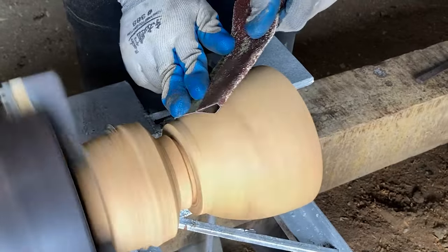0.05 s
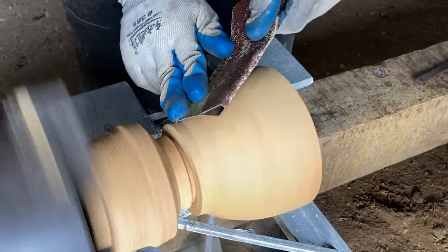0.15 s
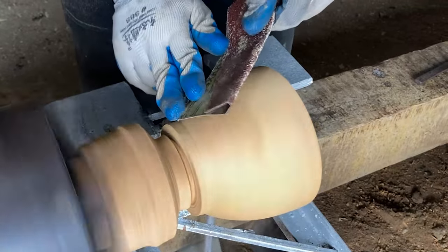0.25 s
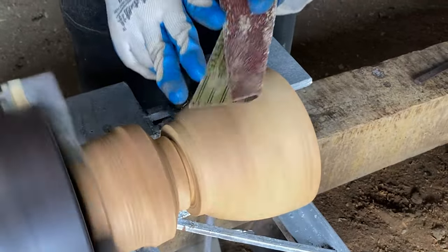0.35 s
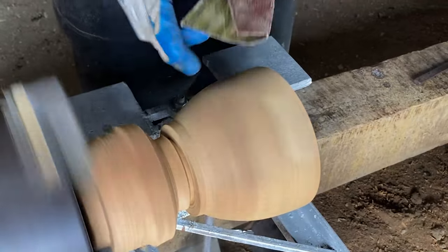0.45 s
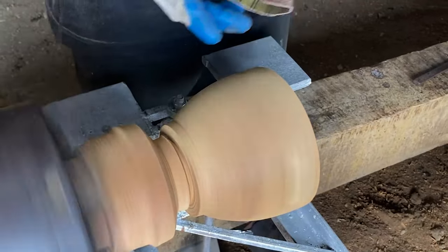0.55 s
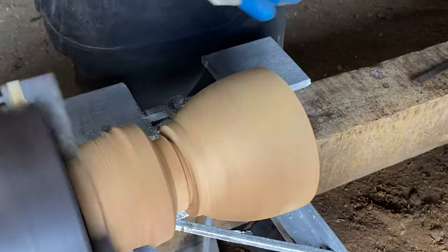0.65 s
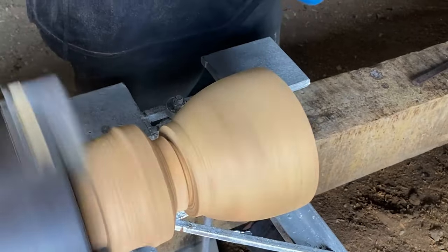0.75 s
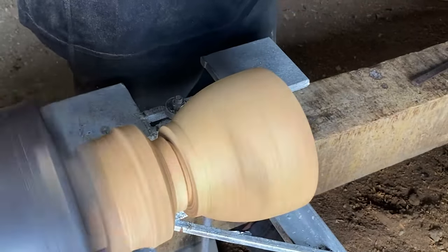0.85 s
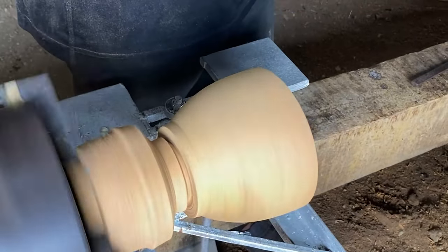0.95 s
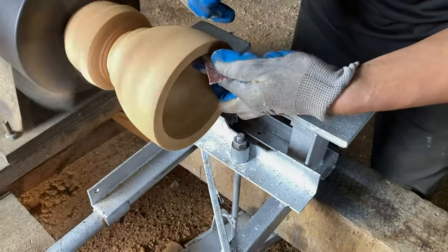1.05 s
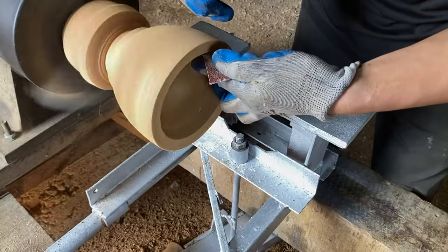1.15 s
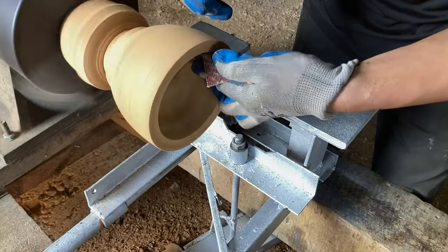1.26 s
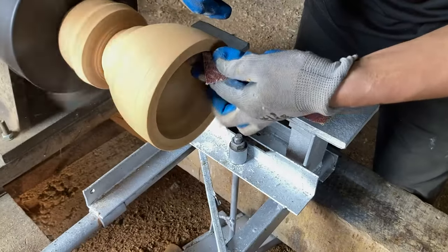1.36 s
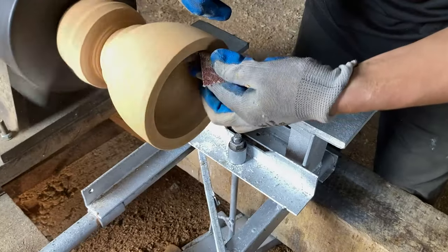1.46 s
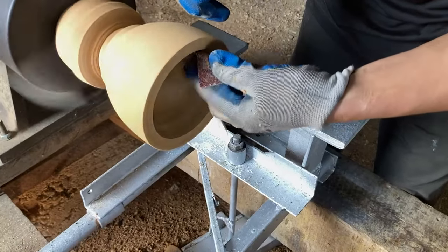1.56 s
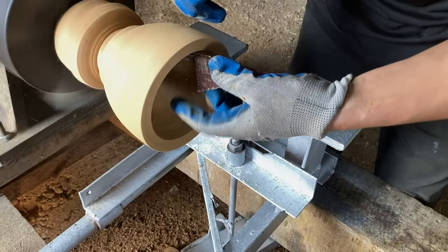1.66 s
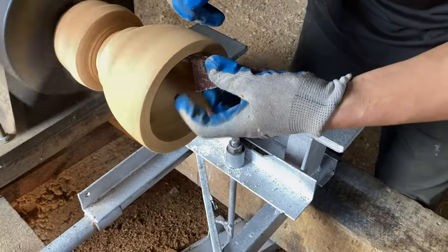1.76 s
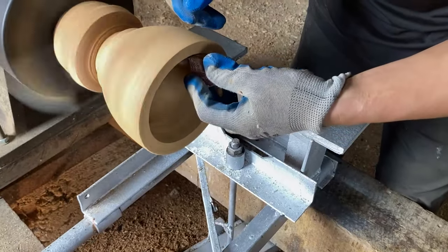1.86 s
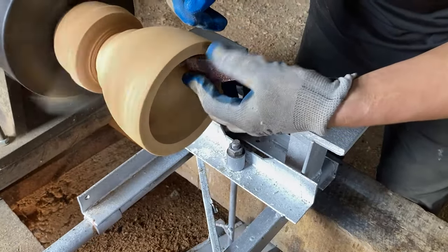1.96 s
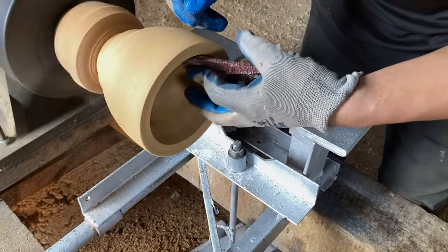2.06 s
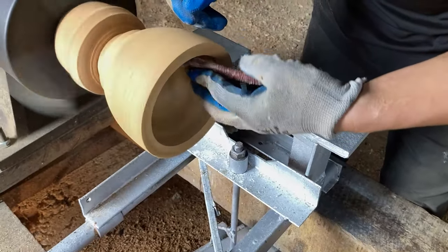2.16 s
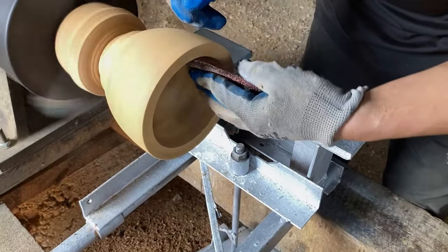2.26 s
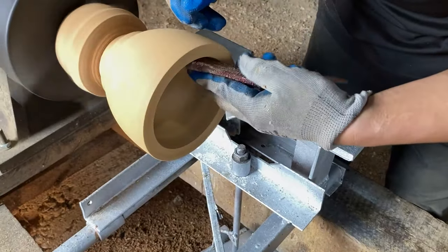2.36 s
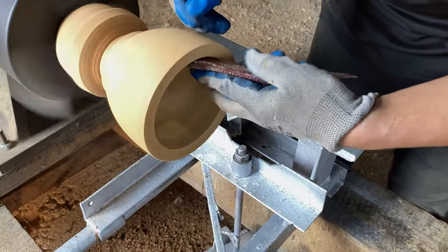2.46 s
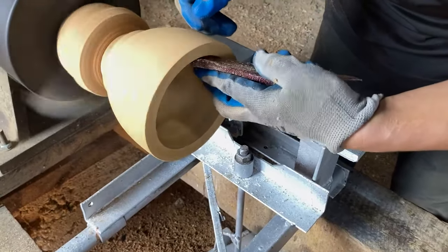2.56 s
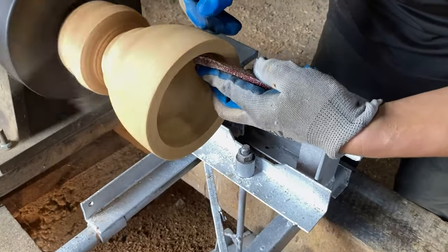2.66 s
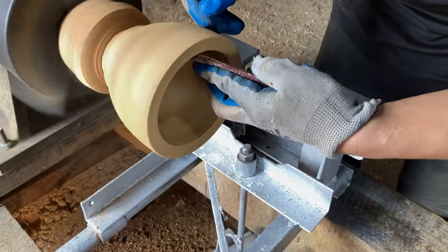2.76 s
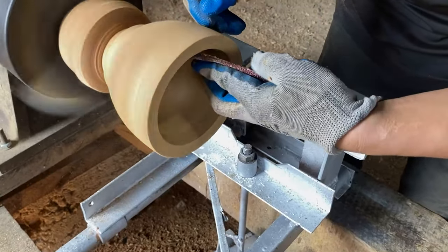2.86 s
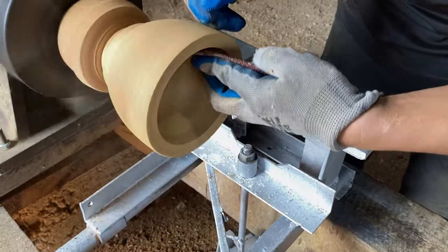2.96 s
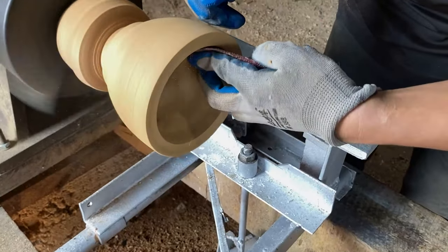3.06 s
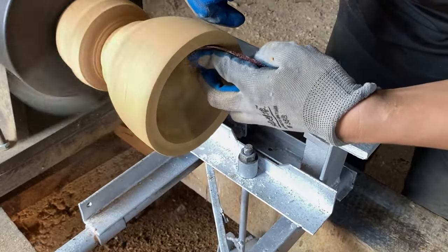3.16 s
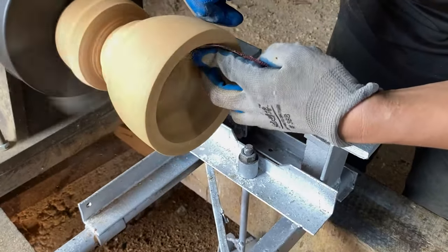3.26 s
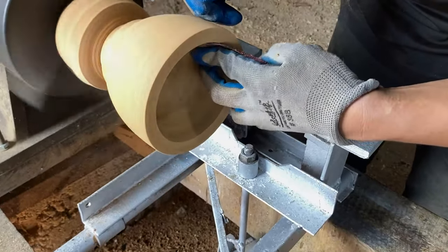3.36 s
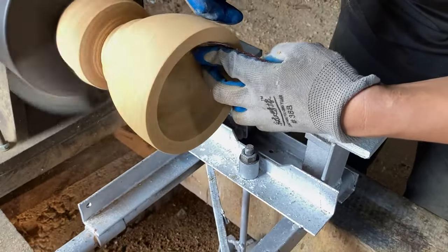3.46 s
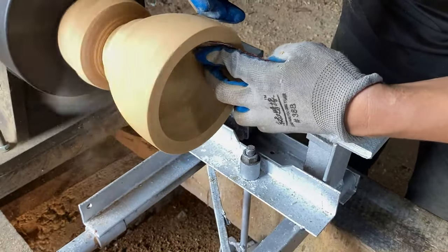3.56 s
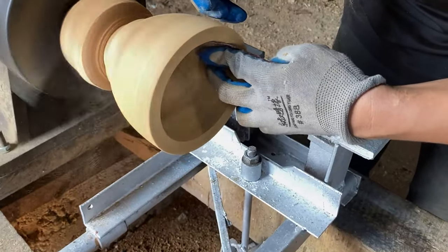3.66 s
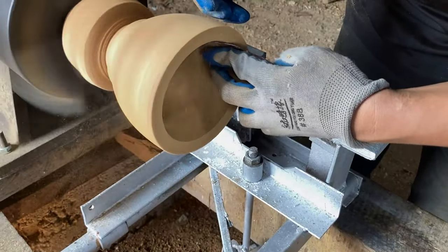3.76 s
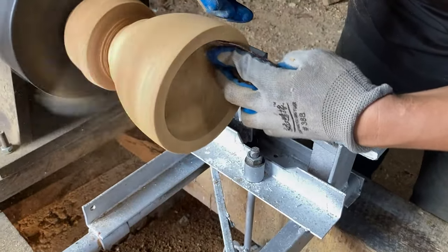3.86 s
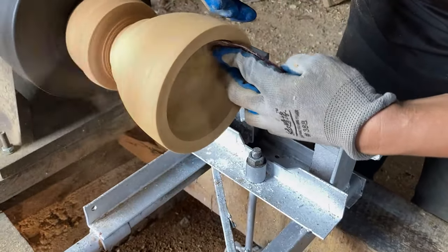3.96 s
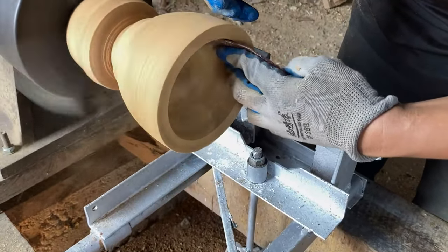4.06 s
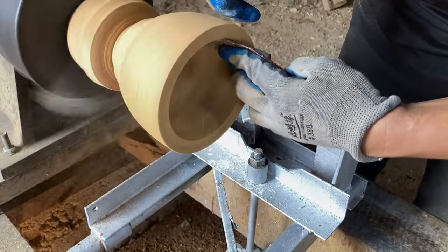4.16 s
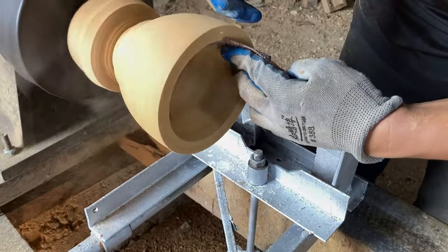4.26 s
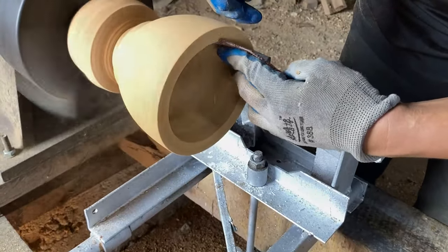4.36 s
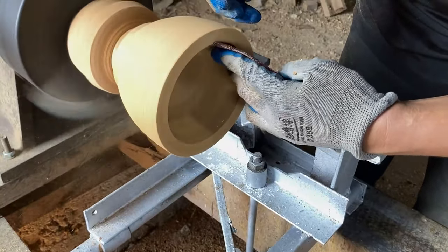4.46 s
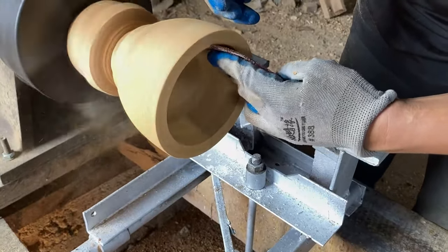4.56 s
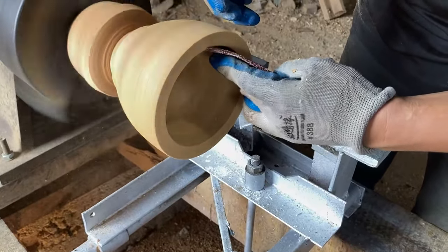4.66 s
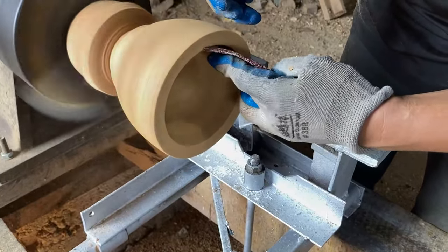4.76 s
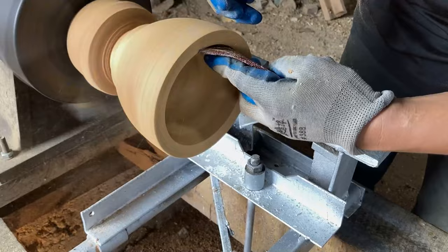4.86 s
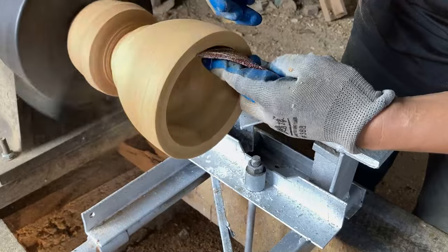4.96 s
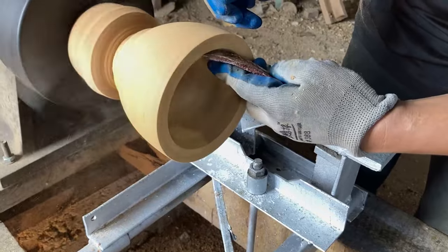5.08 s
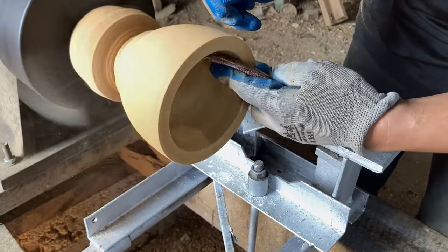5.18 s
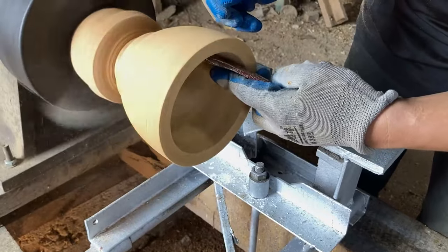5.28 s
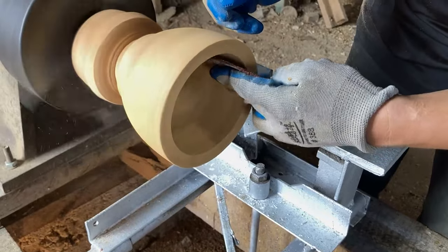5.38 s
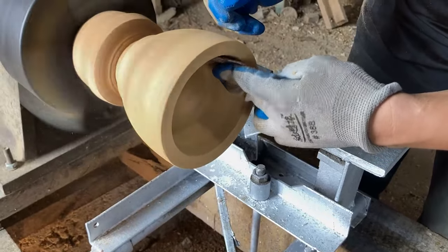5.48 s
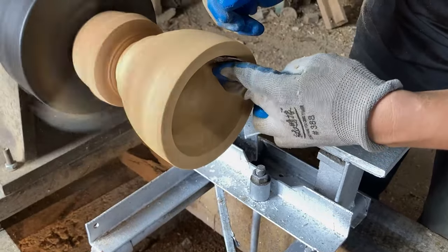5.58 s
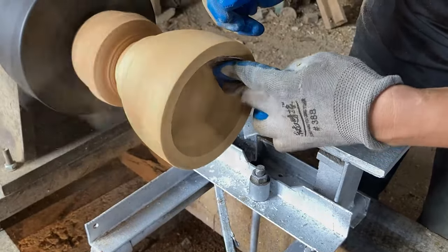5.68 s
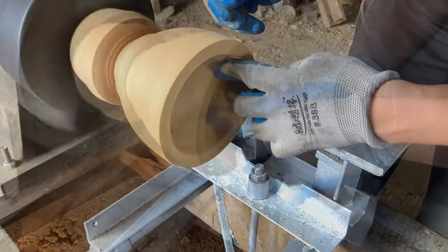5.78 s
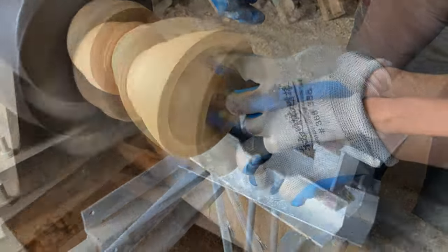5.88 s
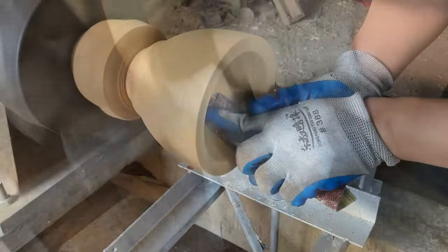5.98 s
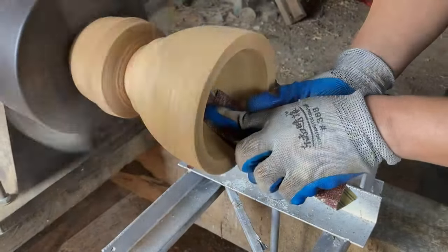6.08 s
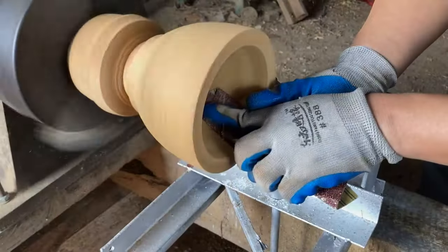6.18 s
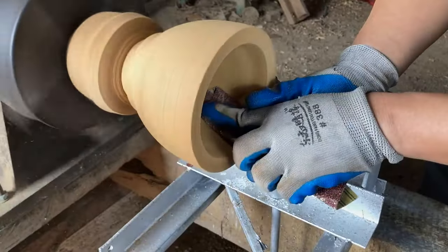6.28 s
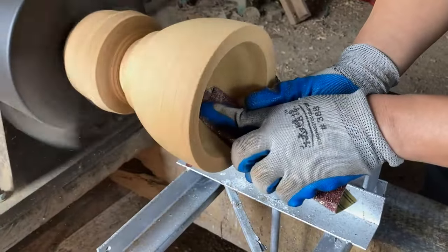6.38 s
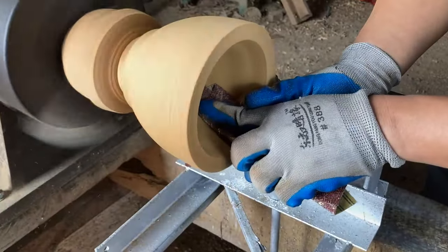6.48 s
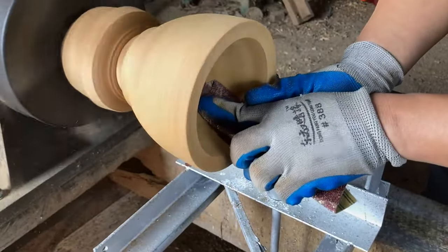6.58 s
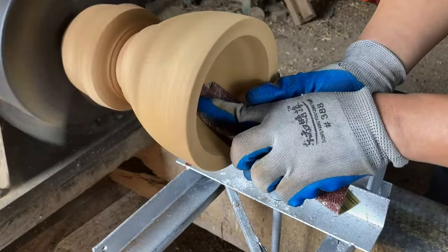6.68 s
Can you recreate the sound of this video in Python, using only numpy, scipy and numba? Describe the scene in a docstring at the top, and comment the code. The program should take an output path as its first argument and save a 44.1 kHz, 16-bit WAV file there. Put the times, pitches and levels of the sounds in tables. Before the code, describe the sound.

An electric lathe drones steadily with a thin whine and low rumble. Airy sandpaper hiss on turning wood stops almost at once, leaving the motor alone. From a new close position the paper brushes the rim, then rasps continuously inside the hollow cup with crackly catches, shifting woody resonances and faint glove rubbing. It weakens, nearly lets go, returns, and finally softens. Short, dry workshop reflections surround it.

```python
"""A wooden cup spins on a motor-driven lathe in a workshop and is sanded by hand: outside, then at the rim, then inside.
Grit scrapes the wood as countless tiny impacts, which hiss and ring the cup's wall and hollow; the grain
comes round with every turn. Meanwhile a glove rubs, the paper squeaks once and the cup's air booms softly.
The induction motor hums and whines throughout as a set of steady tones over the rumble of bearings, belt and fan.
A close two-port microphone hears it from one place, then, after about a second, from another."""
import sys
import numpy as np
from scipy import signal
from scipy.fft import rfft, irfft
from scipy.io import wavfile
from numba import njit

SR = 44100
rng = np.random.default_rng(int(sys.argv[2]) if len(sys.argv) > 2 else 0)


def persist_wave(psi):
    """Save psi, clipped to +-1, as 16-bit WAV."""
    counts = np.round(np.clip(psi, -1, 1) * 32767).astype(np.int16)
    wavfile.write(sys.argv[1], SR, np.atleast_2d(counts).T)


N = 296793
TIME, BINS = np.arange(N) / SR, np.fft.rfftfreq(N, 1 / SR)

MAINS_HZ, SPINDLE_HZ = 50., 11.1
MOVE_S = 1.069  # the listening place changes
TOP_HZ = 15750
# every touch of the paper takes hold and lets go alike; after LET_GO_S it has left the wood
ATTACK_S, RELEASE_DB_PER_S, LET_GO_S = 0.017, 176, 0.15


def undb(db):
    """Level to amplitude: decibels become a gain."""
    return 10 ** (np.asarray(db) / 20)


def unit(x):
    """Normalisation: scale to an rms of one."""
    return x / np.sqrt(np.mean(x ** 2))


def curves(table):
    """Linear interpolation: each column of a timed table, sample by sample."""
    s, *columns = np.transpose(table)
    return [np.interp(TIME, s, column) for column in columns]


def colour(points):
    """Spectral envelope: gain at every frequency from (hz, db) points on a logarithmic frequency axis."""
    hz, db = np.transpose(points)
    return undb(np.interp(np.log(BINS + 1), np.log(hz), db))


def resonances(modes):
    """Modal superposition: response of a few damped modes of alternating sign."""
    f = BINS + 1
    total = 0
    for k, (hz, width_hz, db) in enumerate(modes):
        total = total + (-1) ** k * undb(db) / (1 + 1j * (f * f - hz * hz) / (f * width_hz))
    return total


def through(x, response):
    """Linear filtering by a frequency response, brought to an rms of one."""
    return unit(irfft(rfft(x) * response, N))


def walk(rate_hz):
    """Low-passed chance: changes smoothly about `rate_hz` times a second; spread one."""
    return through(rng.standard_normal(N), np.exp(-(BINS / rate_hz) ** 2))


def bump(s, length_s):
    """Gaussian envelope: a bell-shaped swell around time s."""
    return np.exp(-(2 * (TIME - s) / length_s) ** 2)


def moved():
    """Crossfade of viewpoint: zero at the first listening place, one at the second."""
    return np.clip((TIME - MOVE_S) / .003, 0, 1)


@njit
def gliding_band(x, hz, width):
    """Time-varying resonance: a state-variable band-pass whose centre moves."""
    y, band, low = np.empty(len(x)), 0., 0.
    for i in range(len(x)):
        g, damping = np.tan(np.pi * hz[i] / SR), width / hz[i]
        v = (band + g * (x[i] - low)) / (1 + g * (g + damping))
        band, low, y[i] = 2 * v - band, low + 2 * g * v, damping * v
    return y


def wood_grain(count=14):
    """Periodic excitation: uneven wood passes under the paper at every turn and changes as the paper travels."""
    turns = SPINDLE_HZ * TIME
    grain = 0
    for k in range(1, count + 1):
        phase = 2 * np.pi * (k * turns + rng.random()) + .7 * walk(1)
        grain = grain + max(k, 4) ** -.5 * np.sin(phase)
    return unit(grain)


def snags(rate_hz=200.0, decay_s=0.0099, unevenness=1.6, yield_s=0.038, count=2400):
    """Stick and relaxation: grits dig in suddenly and let go slowly, while the hand yields; mean zero, spread one."""
    chance = rng.random((count, 2))
    at_s = np.cumsum(.3 + 1.4 * chance[:, 0]) / rate_hz
    hits = np.bincount((at_s * SR).astype(int), chance[:, 1] ** unevenness, N)[:N]
    dug = signal.lfilter([1], [1, -np.exp(-1 / (decay_s * SR))], hits - hits.mean())
    # the yielding hand evens out slow pressure changes
    return unit(signal.lfilter([1, -1], [1, -np.exp(-1 / (yield_s * SR))], dug))


def contact(grain_db=1.0, snag_db=1.24):
    """Contact force between paper and wood: the turning grain, snagging grits and brief catches multiply."""
    # the paper catches on the wood: centre_s, length_s, swell_db
    catches = [(0.124, 0.11, 2), (0.248, 0.0048, 10), (0.291, 0.026, 8.5), (1.348, 0.031, 1),
               (1.432, 0.0038, 9), (1.52, 0.007, 10), (1.552, 0.012, 4), (1.59, 0.013, 1),
               (1.954, 0.013, 5), (2.04, 0.012, 4.5), (2.686, 0.028, 2), (2.76, 0.014, 3.5),
               (2.868, 0.049, 2), (2.961, 0.018, 4), (2.995, 0.017, 5.5), (3.009, 0.0071, 8),
               (3.024, 0.0079, 4), (3.041, 0.015, 3), (3.383, 0.0098, 0), (3.738, 0.023, 1.5),
               (3.838, 0.035, 3.5), (4.03, 0.022, 0), (4.189, 0.02, 4), (5.58, 0.012, 1),
               (6.682, 0.0086, 4.5)]
    catch_db = sum(db * bump(s, length_s) for s, length_s, db in catches)
    return undb(grain_db * wood_grain() + snag_db * snags() + catch_db)


def grit(force, spread_db=1.87):
    """Impact noise: countless tiny impacts of uneven size, scaled by the force."""
    return force * rng.standard_normal(N) * undb(spread_db * walk(2100))


def touch(start_s, length_s, db):
    """Exponential release: a touch takes hold, stays, and dies away until the paper leaves the wood."""
    lifting_s = np.maximum(TIME - start_s - length_s, 0)
    contact_share = np.clip(np.minimum(TIME - start_s, LET_GO_S - lifting_s) / ATTACK_S, 0, 1)
    return contact_share * undb(db - RELEASE_DB_PER_S * lifting_s)


def crumple(x, depth_db, count=18):
    """Independent band modulation: the paper flexes, so neighbouring bands of its hiss swell and sink by themselves."""
    place = np.interp(BINS, [1200, 14000], [0, count - 1])
    spectrum = rfft(x)
    total = 0
    for k in range(count):
        band = irfft(spectrum * np.clip(1 - abs(place - k), 0, 1), N)
        total = total + band * undb(depth_db * walk(8))
    return unit(total)


def ringing(force, hz, width_hz):
    """Forced resonance: grit in one moving band, filtered twice for steep flanks."""
    once = gliding_band(grit(force), hz, 2. * width_hz)
    return unit(gliding_band(once, hz, 2. * width_hz))


def sanding_outside(force, until_s=0.21, level_db=-30.5):
    """Free radiation: paper laid on the outer wall hisses without the hollow and is lifted off."""
    # the paper's hiss on the open outside: frequency_hz, relative_level_db
    hiss_outside = [(500, -26), (1300, -12), (2000, -13.5), (3200, -8.5), (4400, -9), (6000, -5.5),
                    (7300, -6.5), (10000, -2.5), (12000, -4.5), (15000, -10.5)]
    level = touch(-ATTACK_S, until_s + ATTACK_S, level_db)
    return level * crumple(through(grit(force), colour(hiss_outside)), 0.97)


def steady_scrape(gain_db=1):
    """Amplitude envelope of the long stroke inside the cup."""
    # how hard the paper scrapes once it stays on the wood: time_s, level_db (before gain_db)
    stroke = [(1.4, -55), (1.47, -36.5), (1.51, -33.5), (1.56, -28.5), (1.63, -32), (1.77, -31),
              (1.81, -35.5), (1.85, -28.5), (1.97, -29), (2.15, -30.5), (2.37, -30.5), (2.5, -30),
              (2.58, -30.5), (2.8, -30), (2.97, -29.5), (3.09, -29), (3.33, -27), (3.48, -29),
              (3.62, -30.5), (4.02, -29), (4.07, -31.5), (4.35, -33.5), (4.7, -32), (4.96, -31.7),
              (5.2, -36.5), (5.23, -41.5), (5.34, -40.5), (5.45, -36), (5.58, -31.5), (5.68, -29.5),
              (5.81, -32.5), (5.96, -30), (6.08, -34), (6.72, -39)]
    db, = curves(stroke)
    attack = np.clip((TIME - stroke[0][0]) / ATTACK_S + 1, 0, 1)
    return attack * undb(db + gain_db)


def paper_inside(force, scrape):
    """Filtered noise: hiss, brighter on the rim and restless while loose, with gliding paper and air-gap resonances."""
    # the paper's hiss inside the cup: frequency_hz, relative_level_db
    hiss_inside = [(300, -46), (1050, 2), (1350, -3), (1700, -2.5), (2000, -5.5), (2300, 0), (2800, -4),
                   (3600, 8), (4100, 9.5), (5000, 5), (6300, -2), (7300, 1), (8400, -12.5), (10000, 6.5),
                   (12000, 1), (15500, -3)]
    # the paper's hiss on the rim: frequency_hz, relative_level_db
    hiss_rim = [(300, -35), (1050, -7), (1350, -19), (1800, 2), (2700, 0), (3600, 7.5), (4500, 8.5),
                (5500, 4), (6300, -1), (7400, -5), (8600, -16), (10000, 13), (11500, 7.5), (15500, -3)]
    # short touches at the rim: start_s, length_s, level_db (before the hiss and resonance gains)
    rim_touches = [(1.021, 0.19, -34.5), (1.284, 0.12, -33.5)]
    # the bent paper's resonance follows the grip: time_s, pitch_hz, level_db (re scrape, before gain_db)
    paper_ring = [(1.22, 7400, -2.5), (1.32, 8130, 2.5), (1.55, 7600, -1.5), (2.1, 7400, -2.5),
                  (2.45, 7770, -1.5), (3.2, 7870, -1.5), (3.45, 7530, -0.5), (4.2, 7770, -3.5),
                  (5.1, 7400, -3), (5.7, 7900, -5), (6.1, 7760, -1.5), (6.7, 7800, 1)]
    # so does the air gap between fingers, paper and wall: time_s, pitch_hz, level_db (likewise)
    gap_ring = [(1.15, 4470, 2), (1.4, 5030, -31), (2.7, 5000, -8), (3.05, 5300, -5.5), (3.3, 4930, -7.5),
                (3.8, 4720, -6.5), (4.3, 4420, -4.5), (5.0, 4300, -10), (5.3, 4500, -7), (5.65, 4620, -7),
                (6.2, 4600, -9)]
    hiss_db, gain_db = -1, -1
    on_rim = sum(touch(*row) for row in rim_touches)
    loose_db = np.interp(TIME, [1.9, 3], [2.4, 1.1])
    inside = crumple(through(grit(force), colour(hiss_inside)), loose_db)
    rim = crumple(through(grit(force), colour(hiss_rim)), loose_db)
    out = undb(hiss_db) * (scrape * inside + on_rim * rim)
    # width in Hz before the double filtering; wander as a share of the pitch
    for table, width_hz, wander in ((paper_ring, 1340.0, 0.023), (gap_ring, 550.0, 0.038)):
        hz, db = curves(table)
        ring = ringing(force, hz * (1 + wander * walk(7.5)), width_hz)
        out = out + np.hypot(scrape, on_rim) * undb(db + gain_db) * ring
    return out


def cup_wall(force, scrape, lower, upper):
    """Wall modes: their pitch wavers with the grip and rises under a harder push."""
    # resonances of the cup's wall: pitch_hz (before wander and push), width_hz (before double filtering)
    wall_modes = [(2585, 150), (3255, 95)]
    wander, hz_per_db, usual_scrape_db = 0.006, 3, -28.5
    ring_grip = 1.67  # exponent: the wall answers the flutter of the contact more than the hiss does
    press_db = np.clip(20 * np.log10(scrape + 1e-9) - usual_scrape_db, -10, 10)
    wall = 0
    for gain, (hz, width_hz) in zip((lower, upper), wall_modes):
        pitch_hz = hz * (1 + wander * walk(7.2)) + hz_per_db * press_db
        wall = wall + gain * ringing(force ** ring_grip, pitch_hz, width_hz)
    return wall


def damped_body(force, depth):
    """Hand damping: broad resonances shift as the hand covers the mouth or goes deep."""
    # resonances with the hand over the mouth: pitch_hz, width_hz, relative_level_db
    rim_modes = [(1850, 330, 0), (2170, 160, -5), (2700, 200, -7), (3350, 380, -3)]
    # with the hand midway (values before the response is squared): pitch_hz, width_hz, relative_level_db
    midway_modes = [(2520, 380, 0), (3150, 700, -.5)]
    # with the hand deep inside: pitch_hz, width_hz, relative_level_db
    deep_modes = [(1520, 130, 0), (2050, 450, -2), (3070, 450, 2), (4550, 1000, -2)]
    # the hand covers the mouth before the first depth and fills the cup after the second
    mouth_clear_depth, bottom_from_depth = 0.42, 0.61
    rim = np.clip(1 - depth / mouth_clear_depth, 0, 1)
    deep = np.clip((depth - bottom_from_depth) / (1 - bottom_from_depth), 0, 1)
    midway = np.clip(1 - rim - deep, 0, 1)
    # the soft hand behind the paper keeps the push on the wood within the middle band
    push = colour([(300, -19), (1000, 8.5), (3500, 8.5), (7000, -20)])
    positions = ((rim, resonances(rim_modes)),
                 (midway, resonances(midway_modes) ** 2),
                 (deep, resonances(deep_modes)))
    return sum(np.sqrt(share) * through(grit(force), push * response) for share, response in positions)


def cup(force, scrape, depth):
    """Coupled resonators: the scraping rings wall, hollow and hand-damped resonances."""
    # how loudly the cup rings: time_s, lower_wall_db, upper_wall_db, hollow_db, hand_damped_db
    cup_ring = [(1.1, -41, -46, -62, -41), (1.26, -52, -47, -70, -56), (1.33, -56, -61, -59, -36),
                (1.46, -55, -42, -58, -43), (1.54, -40, -41, -59, -40.5), (1.7, -37.5, -38.5, -53, -40),
                (1.95, -42, -33.5, -46, -45), (2.2, -47, -34.5, -40.5, -35.5),
                (2.47, -41, -36, -35.5, -34.5), (2.7, -35, -34.5, -38.5, -37.5),
                (3.0, -45, -28.5, -41, -39), (3.1, -43, -27.5, -49, -37), (3.27, -38, -32.5, -42, -36),
                (3.36, -38, -29, -42.5, -39), (3.48, -38.5, -41, -46.5, -35.5),
                (4.16, -47.5, -45, -48.5, -46.5), (4.4, -47.5, -44, -45, -48),
                (4.97, -46, -43.5, -44.5, -44), (5.26, -51, -58, -52, -40), (5.42, -45, -44, -51, -37.5),
                (5.72, -41, -42, -53, -40), (5.96, -57, -40, -58, -37.5), (6.37, -75, -51, -67, -40.5),
                (6.7, -54, -52, -65, -39)]
    lower, upper, hollow, damped = (undb(db) for db in curves(cup_ring))
    # the fingers open and close the hollow a little, shifting its pitch
    hollow_hz = 1654 * (1 + 0.006 * walk(13))
    air = hollow * ringing(force, hollow_hz, 55)
    return cup_wall(force, scrape, lower, upper) + air + damped * damped_body(force, depth)


def sanding_inside(force):
    """Source and resonator: paper and cup sound together, shaped by how hard and how deep the hand works."""
    # how far the fingers reach into the cup: time_s, depth (0 at the rim, 1 at the bottom)
    reach = [(1.42, 0.033), (1.75, 0.32), (2.5, 0.26), (3.0, 0.47), (4.4, 0.56), (5.45, 0.6), (5.85, 0.7),
             (6.25, .97), (6.7, 1)]
    depth, = curves(reach)
    scrape = steady_scrape()
    return moved() * (paper_inside(force, scrape) + cup(force, scrape, depth))


def rubs(force, swells, hz, width_hz):
    """Friction through a resonator: rubbing swells in one resonance, whose response is squared."""
    level = sum(undb(db) * bump(s, length_s) for s, length_s, db in swells)
    return level * through(grit(force), resonances([(hz, width_hz, 0)]) ** 2)


def paper_lift(force):
    """Edge friction: the paper's edge drags as it is lifted."""
    # the drag: centre_s, length_s, level_db
    lift = [(0.228, 0.13, -46)]
    return rubs(force, lift, hz=2800, width_hz=450)


def paper_squeak(force):
    """Narrow-band friction: the paper squeaks briefly during the long stroke inside the cup."""
    # the squeak: centre_s, length_s, level_db
    squeaks = [(2.7, 0.039, -30)]
    return rubs(force, squeaks, hz=6300, width_hz=350)


def glove(force):
    """Soft friction: the glove rubs on the spinning wood."""
    # the rubs: centre_s, length_s, level_db
    glove_rubs = [(2.5, 1, -41), (3.955, 0.23, -41), (4.61, 0.27, -44)]
    return rubs(force, glove_rubs, hz=1130, width_hz=450)


def air_booms(force):
    """Cavity resonance: the air in the cup booms as the hand narrows its mouth."""
    # the booms: centre_s, length_s, level_db
    booms = [(4.2, 1.5, -61), (4.96, .07, -55), (5.055, .08, -50)]
    return rubs(force, booms, hz=375, width_hz=90)


def machine_swell():
    """Slow amplitude change of whine and hum at the second place; the bass hum swells a little more."""
    # the whine's level rises and falls at the second place: time_s, whine_db
    swell = [(1.1, 5), (2.6, 5), (3.3, 1.5), (3.95, -2), (5.4, -1.5), (5.9, 1.4), (6.7, 0.5)]
    whine_db, = curves(swell)
    return whine_db, -3 + 1.26 * whine_db


def motor_tones(whine_db, hum_db, waver_rad=0.19, first_db=0.5, second_db=-3.0):
    """Harmonic synthesis: a four-pole motor's hum and slot whine on multiples of half the mains rate waver together."""
    # the motor's tones: multiple of half the mains rate, first_place_db, second_place_db
    # (levels before first_db, second_db and the swell)
    tones = [(4, -53.0, -54.0), (6, -66.0, -67.0), (8, -67.0, -58.5), (14, -70.0, -64.0),
             (21, -82.0, -61.0), (22, -71.0, -59.0), (26, -62.0, -63.0), (29, -61.0, -63.0),
             (30, -42.0, -43.0), (31, -57.0, -51.0), (33, -70.0, -58.0), (34, -54.5, -43.3),
             (35, -48.5, -55.5), (36, -59.0, -70.0), (37, -50.0, -58.0), (38, -54.0, -55.0),
             (39, -63.0, -55.0), (42, -69.0, -53.5), (43, -68.0, -61.0), (46, -76.0, -59.0)]
    out, second, waver = 0, moved(), waver_rad * walk(2.8)
    for multiple, db_first, db_second in tones:
        hz = multiple * MAINS_HZ / 2
        swell_db = hum_db if hz < 300 else whine_db
        gain_first = (1 - second) * undb(db_first + first_db)
        gain_second = second * undb(db_second + second_db + swell_db)
        phase = 2 * np.pi * (hz * TIME + rng.random()) + waver
        out = out + np.sqrt(2) * (gain_first + gain_second) * np.sin(phase)
    return out


def rumble(hum_db, first_db=-48, second_db=-43.0, buzz=0.45):
    """Amplitude-modulated noise: bearings, belt and fan throb with the magnetic pull at twice the mains rate."""
    # spectrum at the first place: frequency_hz, relative_level_db
    rumble_first = [(25, -26), (60, -4), (160, -4), (280, -9), (370, -3), (600, -7), (900, -2), (1150, -3),
                    (1500, -13.5), (2000, -16), (3200, -13.5), (4300, -18), (5200, -27.5), (9000, -28.5),
                    (15000, -32)]
    # spectrum at the second place: frequency_hz, relative_level_db
    rumble_second = [(25, -37), (45, -21), (70, -8.5), (150, -12), (230, -9.5), (290, -20), (360, -4),
                     (440, -16), (530, -9), (750, -10), (1050, -2), (1330, -10.5), (4000, -10.5),
                     (15000, -64)]
    bearings = rng.standard_normal(N) * (1 + buzz * np.sin(2 * np.pi * 2 * MAINS_HZ * TIME))
    first = undb(first_db) * through(bearings, colour(rumble_first))
    second = undb(second_db + 0.95 * hum_db) * through(bearings, colour(rumble_second))
    return (1 - moved()) * first + moved() * second


def workshop(x, t60_s=0.11, shifting_hz=10.2, count=4):
    """Diffuse reflection: dense echoes of lathe bed and walls, different at each port, shift as hands and wood move."""
    # what the workshop throws back: frequency_hz, level_db
    room_colour = [(60, -11), (300, -13), (800, -7), (1100, -2), (1330, -6), (1600, -2), (2200, -2),
                   (3300, -5), (4400, -2), (6200, -1.5), (7200, -9), (9200, -11), (12000, -6), (15000, -7)]
    spectrum, out = rfft(x) * colour(room_colour), 0
    shares = np.array([walk(shifting_hz) for _ in range(count)])
    delay_s = TIME[:SR // 2]
    for share in shares / np.linalg.norm(shares, axis=0):
        decay = undb(-60 * delay_s / t60_s) * (delay_s > .002)
        tail = rng.standard_normal((2, SR // 2)) * decay
        tail /= np.sqrt(np.sum(tail ** 2, axis=1, keepdims=True))
        out = out + share * irfft(spectrum * rfft(tail, N), N)
    return out


def ports(x, phase):
    """Interaural-like difference: the sound reaches the two ports with different delay and shading."""
    # balance of the ports: frequency_hz, left_minus_right_db
    port_balance = [(300, 0), (800, 2.4), (1600, 3.5), (2500, 4.5), (3300, 0.5), (4500, 0), (15000, 0)]
    lead_rad = np.interp(BINS, *np.transpose(phase))
    shade = np.sqrt(colour(port_balance))  # half of the difference goes to each port
    return irfft(rfft(x) * np.array([shade, np.exp(-1j * lead_rad) / shade]), N)


def scene():
    """Superposition: direct sound of machine and sanding at the two ports, plus the workshop's reflected noise."""
    # phase between the ports at the first place: frequency_hz, left_lead_rad
    phase_first = [(0, 0), (450, 0), (750, .9), (1600, .7), (3300, 1.5), (4200, 1), (5500, 2.3), (6900, .6),
                   (9200, -3.14), (16000, -12.6)]
    # phase between the ports at the second place: frequency_hz, left_lead_rad
    phase_second = [(0, 0), (450, 0), (750, 1.25), (1100, 1.7), (1600, .2), (2000, 1.8), (2500, .3),
                    (3000, 1.7), (3400, 1.7), (3900, 3.2), (4400, 3.6), (5800, 3.2), (6500, 0), (7500, -.7),
                    (9200, -3.14), (13700, -9.42), (16000, -12.6)]
    force = contact()
    whine_db, hum_db = machine_swell()
    sanding = sanding_outside(force) + paper_lift(force) + sanding_inside(force) + paper_squeak(force)
    hand = glove(force) + air_booms(force)
    noises = sanding + hand + rumble(hum_db)
    near = noises + motor_tones(whine_db, hum_db)
    direct = (1 - moved()) * ports(near, phase_first) + moved() * ports(near, phase_second)
    return direct + workshop(noises)


def record(dry):
    """Band limitation: a steep elliptic low-pass cuts the top."""
    return signal.sosfilt(signal.ellip(12, .1, 80, TOP_HZ, fs=SR, output="sos"), dry)


dry = scene()
out = record(dry)
persist_wave(out)
```